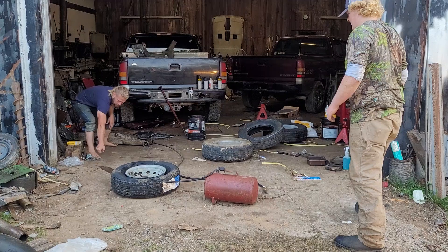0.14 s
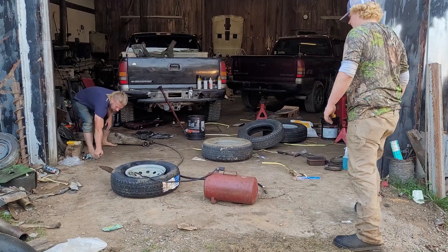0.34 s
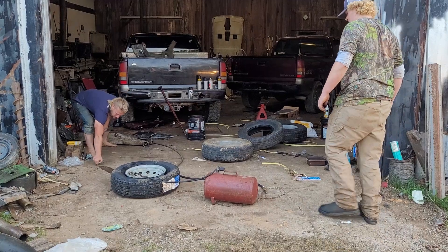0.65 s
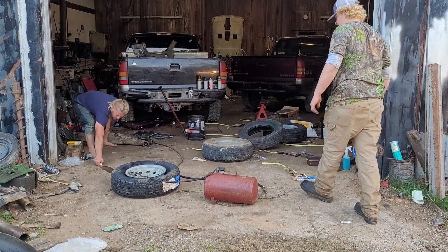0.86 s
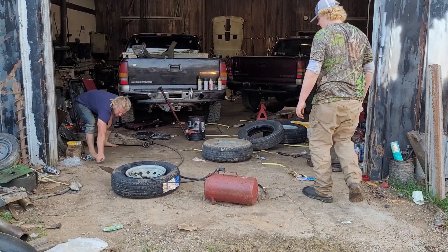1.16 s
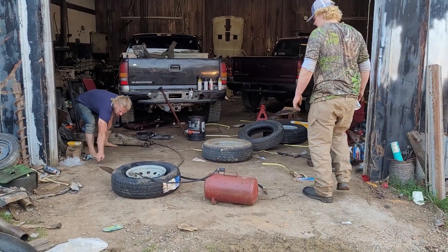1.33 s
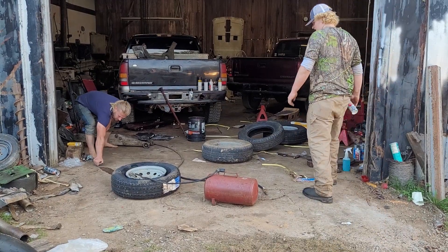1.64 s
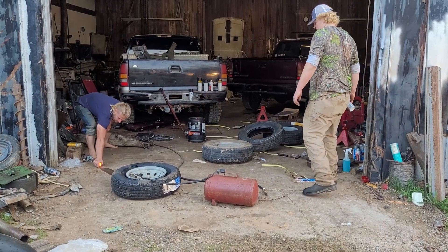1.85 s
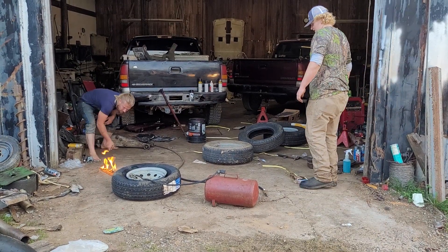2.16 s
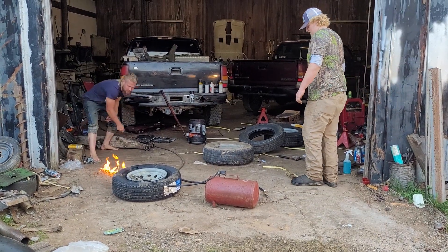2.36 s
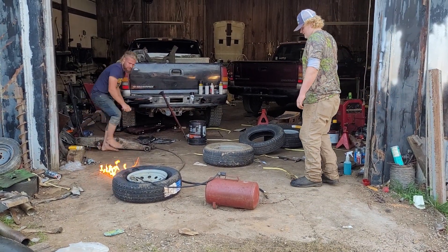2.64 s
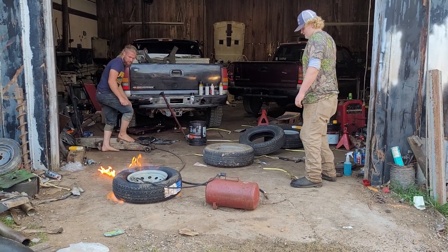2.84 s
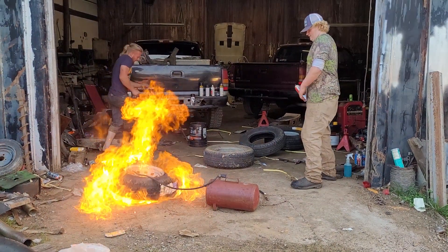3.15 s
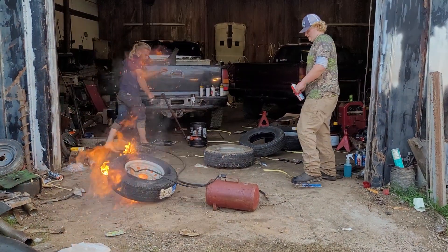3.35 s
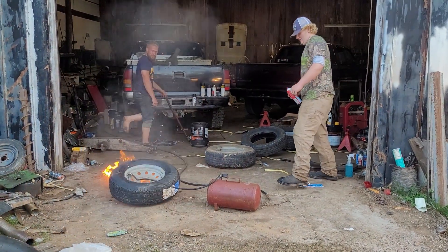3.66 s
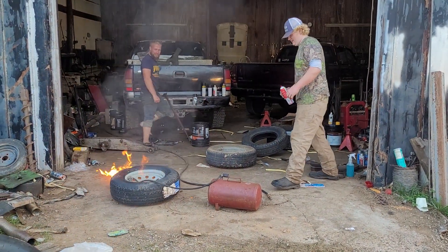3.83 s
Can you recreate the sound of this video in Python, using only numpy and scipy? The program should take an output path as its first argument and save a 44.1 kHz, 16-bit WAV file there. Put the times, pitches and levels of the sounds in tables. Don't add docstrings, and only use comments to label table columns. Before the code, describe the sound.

An explosive tyre bang breaks over leaking air, compressor drone and crickets, then wheel bounces

```python
import sys
import numpy as np
from scipy import signal
from scipy.io import wavfile
from scipy.ndimage import uniform_filter1d

SR = 44100
rng = np.random.default_rng(int(sys.argv[2]) if len(sys.argv) > 2 else 0)


def wav_record(signal):
    frames = np.transpose(np.atleast_2d(signal))
    bounded = np.clip(frames, -1, 1)
    quanta = np.round(bounded * 32767).astype(np.int16)
    wavfile.write(sys.argv[1], SR, quanta)


def undo_db(level):
    steps = np.asarray(level, float) / 20
    return 10 ** steps


N = 176400
TIME = np.arange(N) / SR

START_S = .1112
BANG_S, DUCK_S = 3.008, .005

# pitch_hz, left_right_likeness
STEREO_LIKENESS = [(30, .75), (70, 0.9), (300, .92), (900, .65), (1600, 0.21), (5000, .55), (7800, 0.23),
                   (13500, 0.46), (16000, .25)]
# pitch_hz, lead_rad
LEFT_LEAD = [(0, 0), (950, 0.46), (3530, 12), (4570, 21), (5340, 21.5), (6890, 34), (10900, 36.5),
             (16200, 61)]
# pitch_hz, left_minus_right_db
LEFT_TILT = [(60, -2.5), (150, -0.5), (380, -1.0), (950, -0.5), (2380, 0.0), (5980, 3.5), (15000, 5)]

# pitch_hz, level_db
RUMBLE_SPECTRUM = [(12, -38), (20, -8.5), (107, -1.5), (176, -11.5), (225, -2.5), (312, 0), (344, -2.5),
                   (520, -25), (600, -15.5), (780, -45.5), (1320, -120)]
RUMBLE_DB, RUMBLE_DUCK_DB = -41, -21.5
# shaft_multiple, level_db
MOTOR_ORDERS = [(1, -4), (2, -3), (3, 0.5), (4, -7), (5, -13), (6, -0.5), (7, -3.5), (8, 0), (9, 0),
                (10, -9.5), (11, -13), (12, -18.5), (13, -16.5)]
SHAFT_HZ, MOTOR_DB, MOTOR_WAVER_DB = 37.33, -44, 3

# start_s, level_db
CHIRPS = [(.35, -32.5), (.641, -32), (.936, -33.5), (1.244, -33), (1.534, -32.5), (1.836, -33),
          (2.163, -32), (2.497, -33), (2.8, -32.5)]
SYLLABLE_GAP_S, SYLLABLE_S, FIRST_SYLLABLE_DB = .0385, .0215, -2
CHIRP_TOP_HZ, CHIRP_END_HZ = 5003, 4405
WALL_ECHO_S, WALL_ECHO_DB = .006, -7
CHORUS_HZ, CHORUS_WIDTH_HZ, CHORUS_DB, CHORUS_THROB_HZ = 4436, 60, -53.5, 12

# pitch_hz, level_db
HISS_SPECTRUM = [(260, -35), (450, -8), (525, -11), (959, -7), (1470, -13), (2140, -6), (2720, -7.5),
                 (4740, -3), (7600, -11), (9880, -42), (16700, -120)]
HISS_DB, HISS_DUCK_DB = -39, -36
# pitch_hz, level_db
FIZZ_SPECTRUM = [(4290, -31), (7300, -2.5), (7910, -9), (8850, -8), (11200, -5), (12200, -4), (13100, -8),
                 (15100, 0), (15700, -2)]
FIZZ_DB, FIZZ_DUCK_DB, FIZZ_TOP_HZ = -44, -51, 15740
# pitch_hz, width_hz, level_over_hiss_db
JET_RESONANCES = [(983, 50, 4), (1280, 120, 9), (1760, 74, 1.5), (2200, 140, 4), (2950, 500, -2),
                  (3580, 450, 1.5), (4380, 150, 1.5), (5820, 60, 4), (6646, 110, 7)]
RIPPLE_DB = 2.0
# pitch_hz, width_hz, share_of_time
DROPOUT_BANDS = [(2750, 160, .05), (3150, 200, .1), (4060, 170, .07), (5300, 170, .06), (11500, 200, .05),
                 (13100, 260, .16)]
# start_s, length_s
CALL_HOLES = [(.36, .06), (.47, .03), (.55, .04), (.67, .025), (.76, .02), (.98, .07), (1.17, .03),
              (1.28, .03), (2.17, .05), (2.26, .04)]
HOLE_HZ, HOLE_WIDTH_HZ = 2740, 200

PUFF_S, PUFF_LENGTH_S, PUFF_DB = 3.44, .15, -81

# start_s, thump_db, knock_db, tick_db
LANDINGS = [
    (3.373, -43, -42, -55),
    (3.588, -57, -59.5, -72),
    (3.7, -60, -57, -65.5),
    (3.717, -40, -38, -57),
    (3.85, -66, -54, -64),
    (3.989, -58.5, -27, -52),
]
# pitch_hz, level_db, t60_s
THUMP_MODES = [(60, -0.5, 0.26), (95.3, -2, 0.18), (164.3, -8, 0.17)]
# pitch_hz, level_db, t60_s
KNOCK_MODES = [(278, 1.5, .12), (330, -4, 0.19), (421, -14.5, .12), (1005, -18, 0.23)]
# start_s, pitch_hz, level_db, t60_s
RIM_PINGS = [(2.989, 3885, -20, .06), (3.0215, 4110, -18, .03), (3.029, 4145, -15, .04),
             (3.029, 13920, -27, .025), (3.029, 1700, -19, .05), (3.03, 1041, -17, .12),
             (3.0, 380, -17, .1), (3.05, 759, -16, .15), (3.115, 878, -28.5, 0.19), (3.373, 1930, -50, .06),
             (3.395, 564, -52.5, 0.16), (3.395, 850, -52, .12), (3.718, 1750, -58, .05),
             (3.718, 2350, -60, .04), (3.718, 1000, -54, .07), (3.75, 1010, -66, .2), (3.4, 1130, -58, .25),
             (3.989, 903, -48.5, .04), (3.989, 1270, -54, .04)]

WHOOSH_S = 2.985
WHOOSH_DB, WHOOSH_DB_PER_S, FLASH_DB, FLASH_DB_PER_S = -36, 60, -28, 800
# start_s, push, pitch_hz, t60_s
PRESSURE_SWINGS = [(2.9847, -0.11, 170, .03), (2.9875, .25, 250, .02), (2.9911, -0.6, 85.8, 0.081),
                   (2.9915, -.4, 220, .015), (2.9995, -1.4, 125, 0.026), (3.0094, 1.1, 174, 0.031),
                   (3.015, 0.46, 269.4, .07), (3.0227, .6, 200, 0.034), (3.035, 0.13, 60, 0.25)]
FRONT_RAD, FRONT_S = .91, .0008
# start_s, level_db, t60_s, brightness_db_per_octave
CRACKS = [(2.985, -17, 0.1, -0.5), (2.988, -15, .04, 1), (2.992, -14.5, 0.06, 0.5), (2.9965, -16, .04, 0),
          (3.0005, -12, 0.03, 1.5), (3.009, -18, 0.033, -4.5), (3.0214, -8, .018, -1.5),
          (3.0286, -6, .022, 3.5), (3.0326, -15, .04, 0), (3.037, -14, .05, -1.5),
          (3.0435, -11, 0.037, 0.5), (3.048, -15, .05, -1), (3.053, -13.5, 0.049, -1),
          (3.059, -13.5, 0.07, -1), (3.065, -18, .07, -2), (3.075, -23, .08, -2)]
# pitch_hz, level_db
CRACK_SPECTRUM = [(330, -9), (565, -16), (850, -4.5), (1500, -14.5), (3200, -10.5), (5800, -18.5),
                  (9090, -35), (16000, -34)]
# pitch_hz, level_db
TAIL_SPECTRUM = [(25, -34), (60, -8), (180, -12), (328, -6), (569, -20.5), (889, -12), (1200, -20),
                 (4800, -21), (8000, -36)]
TAIL_S, TAIL_DB = 3.029, -30.5
# pitch_hz, t60_s
GARAGE_DECAY = [(60, .6), (250, 0.48), (1000, 0.6), (3000, 0.55), (7000, 0.5), (11000, .36), (15500, .33)]
LATE_DB, LATE_STRETCH = -14, 1.6
# pitch_hz, level_db, t60_s
STEEL_MODES = [(130.6, 0, 0.34), (226.3, -4.5, 0.61), (328, -4, 0.38), (767, -16.5, 0.66), (885, -17, 0.32),
               (940, -16, 0.43), (1440, -22, 0.33), (2020, -21.5, 0.32), (2750, -22, 0.37),
               (2900, -23, 0.37)]
STEEL_DB = -22
BLAST_LEFT_DB = -1.5

CHOKE_S, CHOKE_END_S, CHOKE_HZ = 3.0125, 3.0205, 8300
EDGE_HZ = 16250


def evened(x):
    return x / np.sqrt(np.mean(x ** 2) + 1e-20)


def read(points, hz):
    f, value = np.transpose(points)
    return np.interp(np.log(hz + 1), np.log(f + 1), value)


def band(points, hz):
    return read(points, hz) - 80 * ((hz < points[0][0]) | (hz > points[-1][0]))


def add(mix, s, sound):
    part = mix[:, round(s * SR):][:, :sound.shape[-1]]
    part += sound[..., :part.shape[1]]


def rise(t, seconds):
    return np.minimum(t / seconds, 1)


def right_first(sound):
    return np.array([np.r_[np.zeros(5), sound[:-5]], sound])


def slow(top_hz):
    t = TIME[::256]
    sines = sum(np.sin(2 * np.pi * (f * t + rng.random())) / np.sqrt(f)
                for f in top_hz * np.geomspace(.05, 1, 12))
    return np.interp(TIME, t, evened(sines))


def noise(shape_db, size=1024, patchy_db=1.5, count=N):
    frames, hz = count * 2 // size + 3, np.fft.rfftfreq(size, 1 / SR)[:, None]
    a, b, c, d, patch = rng.standard_normal((frames, len(hz), 5)).T
    patch = uniform_filter1d(patch, size=8, axis=0)
    patch = evened(uniform_filter1d(patch, size=5, axis=1))
    same = np.clip(read(STEREO_LIKENESS, hz), 0, 1)
    left = a + 1j * b
    shared = same * left * np.exp(-1j * read(LEFT_LEAD, hz))
    right = shared + np.sqrt(1 - same ** 2) * (c + 1j * d)
    tilt_db = read(LEFT_TILT, hz) / 2
    z = np.array([left * undo_db(tilt_db), right * undo_db(-tilt_db)])
    z *= undo_db(shape_db(hz, np.arange(frames) * size / 2 / SR) + patchy_db * patch)
    return signal.istft(z, window="cosine", nperseg=size, noverlap=size // 2)[1][:, :count]


def modes(table, seconds):
    t = np.arange(0, seconds, 1 / SR)
    return sum(undo_db(db - 60 * t / t60) * np.sin(2 * np.pi * hz * t) for hz, db, t60 in table)


def ducked(depth_db):
    return undo_db(depth_db * (1 - np.exp(-np.maximum(TIME - BANG_S, 0) / DUCK_S)))


def compressor():
    turns = np.cumsum(SHAFT_HZ * (1 + .006 * slow(3.0))) / SR
    drone = sum(undo_db(db + MOTOR_WAVER_DB * slow(8.0)) * np.sin(2 * np.pi * (k * turns + rng.random()))
                for k, db in MOTOR_ORDERS)
    rumble = evened(noise(lambda hz, s: band(RUMBLE_SPECTRUM, hz), size=4096))
    return ducked(RUMBLE_DUCK_DB) * (undo_db(MOTOR_DB) * evened(drone) + undo_db(RUMBLE_DB - 3) * rumble)


def crickets():
    out, t = np.zeros((2, N)), np.arange(0, SYLLABLE_S, 1 / SR)
    fall = (CHIRP_END_HZ - CHIRP_TOP_HZ) * (t / SYLLABLE_S) ** 1.65
    sides = undo_db(np.array([[-2.5], [1.5]]))
    chance = rng.standard_normal((len(CHIRPS), 3))
    for (s, db), wobble in zip(CHIRPS, chance):
        for k in range(3):
            hz = (CHIRP_TOP_HZ + fall) * (1 + .0057 * wobble[k])
            flutter = 1 + .29 * np.sin(2 * np.pi * (230 * t + wobble[k - 2]))
            swell = np.sin(np.pi * t / SYLLABLE_S)
            tone = swell * flutter * np.sin(2 * np.pi * np.cumsum(hz) / SR)
            level_db = db - 2.5 + FIRST_SYLLABLE_DB * (k == 0) + 1.6 * wobble[k - 1]
            add(out, s + k * SYLLABLE_GAP_S, undo_db(level_db) * tone * sides)
    out += undo_db(WALL_ECHO_DB) * np.roll(out[::-1], round(WALL_ECHO_S * SR), axis=1)
    far = evened(noise(lambda hz, s: -10 * np.log10(1 + (2 * (hz - CHORUS_HZ) / CHORUS_WIDTH_HZ) ** 4)))
    return (out + undo_db(CHORUS_DB + 3.1 * slow(CHORUS_THROB_HZ)) * far) * ducked(-45)


def dropouts(hz, s):
    runs = uniform_filter1d(rng.standard_normal((len(s), len(DROPOUT_BANDS))), size=4, axis=0)
    holes = sum((s > start) & (s < start + length) for start, length in CALL_HOLES)
    change_db = -30 * holes * (abs(hz - HOLE_HZ) < HOLE_WIDTH_HZ / 2)
    for (f, width, share), run in zip(DROPOUT_BANDS, runs.T):
        change_db = change_db - 30 * (abs(hz - f) < width / 2) * (run < np.quantile(run, share))
    return change_db


def leak():
    def jet(hz, s):
        peaks = sum(db / (1 + (2 * (hz - f) / w) ** 2) for f, w, db in JET_RESONANCES)
        return peaks + RIPPLE_DB * rng.standard_normal(hz.shape) + dropouts(hz, s)

    hiss = evened(noise(lambda hz, s: band(HISS_SPECTRUM, hz) + jet(hz, s)))
    fizz = evened(noise(lambda hz, s: band(FIZZ_SPECTRUM, hz) + jet(hz, s) - 60 * (hz > FIZZ_TOP_HZ),
                        patchy_db=1.2))
    drift = undo_db(.3 * slow(6.0) - np.clip(TIME - 2.5, 0, .3) * 4)
    hiss = undo_db(HISS_DB) * drift * ducked(HISS_DUCK_DB) * hiss
    return hiss + undo_db(FIZZ_DB) * ducked(FIZZ_DUCK_DB) * fizz


def puff():
    out, t = np.zeros((2, N)), np.arange(0, PUFF_LENGTH_S, 1 / SR)
    air = evened(noise(lambda hz, s: band([(6500, 0), (15700, -3)], hz), count=len(t)))
    add(out, PUFF_S, undo_db(PUFF_DB) * np.sqrt(np.sin(np.pi * t / PUFF_LENGTH_S)) * air)
    return out


def wheel():
    out, t = np.zeros((2, N)), np.arange(0, .4, 1 / SR)
    for s, thump_db, knock_db, tick_db in LANDINGS:
        scatter = rng.standard_normal((3, len(t)))
        echo = (scatter[0] + .32 * scatter[1:]) * undo_db(-29 - 60 * t / .36)
        echo[:, 0] = [.8, 1]
        thump = modes(THUMP_MODES, .4) * rise(t, .0089)
        knock = signal.fftconvolve(modes(KNOCK_MODES, .4)[None], echo, axes=1)[:, :len(t)] * rise(t, .0033)
        tick = signal.lfilter(*signal.butter(2, 2600, fs=SR), scatter[1:])
        tick = tick * (undo_db(-60 * t / .028) + undo_db(-3 - 60 * t / .5))
        add(out, s, undo_db(thump_db) * thump + undo_db(knock_db - 4.5) * knock + undo_db(tick_db) * tick)
    return out


def rim():
    out = np.zeros((2, N))
    for s, hz, db, t60 in RIM_PINGS:
        ring = modes([(hz, db, t60), (hz * 1.035, db - 6.5, t60)], .3)
        add(out, s, right_first(ring)[::-1] * rise(np.arange(len(ring)) / SR, .001))
    return out


def whoosh():
    out, t = np.zeros((2, N)), np.arange(SR) / SR
    roar = evened(noise(lambda hz, s: read(TAIL_SPECTRUM, hz) - 5 * np.log2(1 + hz / 500),
                        patchy_db=3.5, count=SR))
    swell = undo_db(WHOOSH_DB + WHOOSH_DB_PER_S * (t - 1))
    flash = undo_db(FLASH_DB + FLASH_DB_PER_S * (t - 1))
    add(out, WHOOSH_S - 1, roar * (swell + flash))
    return out


def pressure():
    out, t = np.zeros((2, N)), np.arange(SR) / SR
    for s, push, hz, t60 in PRESSURE_SWINGS:
        swing = push * undo_db(-60 * t / t60) * np.sin(2 * np.pi * hz * t + FRONT_RAD)
        add(out, s, right_first(swing * rise(t, FRONT_S)))
    return out


def garage():
    def decay(hz, s):
        early_db = -60 * s / read(GARAGE_DECAY, hz)
        colour_db = read(TAIL_SPECTRUM, hz) - 10 * np.log2(np.maximum(hz / 8000, 1))
        return colour_db - 30 * (hz > FIZZ_TOP_HZ) + np.maximum(early_db, LATE_DB + early_db / LATE_STRETCH)

    out, t = np.zeros((2, N)), np.arange(SR) / SR
    tail = evened(noise(decay, size=512, patchy_db=1.8, count=SR)) * rise(t, .0096)
    steel = modes(STEEL_MODES, 1) * undo_db(1.5 * slow(30.0)[:SR]) * rise(t, .01)
    add(out, TAIL_S, undo_db(TAIL_DB) * tail + undo_db(STEEL_DB) * steel)
    return out


def cracks():
    out, t = np.zeros((2, N)), np.arange(SR // 5) / SR
    for s, db, t60, bright_db in CRACKS:
        def colour(hz, _):
            return read(CRACK_SPECTRUM, hz) - 20 * (hz < 150) + bright_db * np.log2(hz / 3000 + .01)

        burst = evened(noise(colour, size=256, count=len(t)))
        add(out, s, undo_db(db - 60 * t / t60) * rise(t, .0011) * burst)
    return out


def blast():
    sides = undo_db(np.array([[BLAST_LEFT_DB / 2], [-BLAST_LEFT_DB / 2]]))
    return (whoosh() + pressure() + garage() + cracks()) * sides


def scene():
    return compressor() + crickets() + leak() + puff() + wheel() + rim() + blast()


def top_cut(x):
    return signal.sosfilt(signal.butter(12, 16650, fs=SR, output="sos"), x)


def record(dry):
    x = np.tanh(dry / .94) * .98 * np.clip((TIME - START_S) / .0014, 0, 1)
    high_pass = signal.firwin(127, CHOKE_HZ, window=("kaiser", 9), pass_zero=False, fs=SR)
    treble = signal.oaconvolve(x, high_pass[None], "same")
    choke = np.clip(np.minimum(TIME - CHOKE_S, CHOKE_END_S - TIME) / .0015, 0, 1)
    x = x - treble * choke
    low_pass = signal.firwin(511, EDGE_HZ, window=("kaiser", 9), fs=SR)
    x = signal.oaconvolve(x, low_pass[None], "same")
    return top_cut(x)


dry = scene()
out = record(dry)
wav_record(out)
```